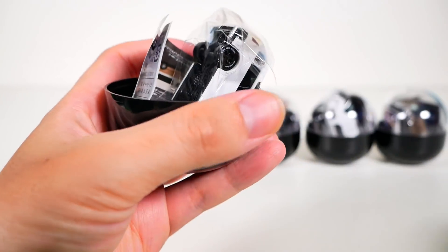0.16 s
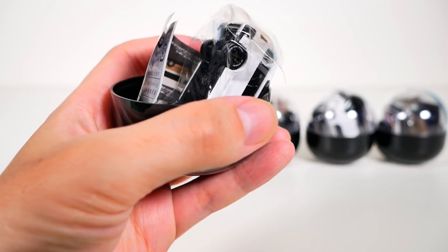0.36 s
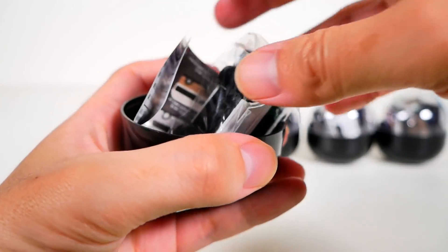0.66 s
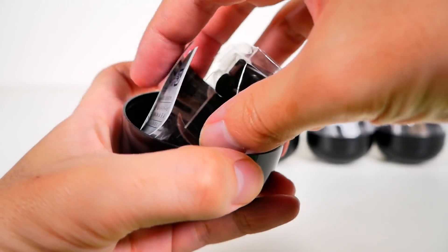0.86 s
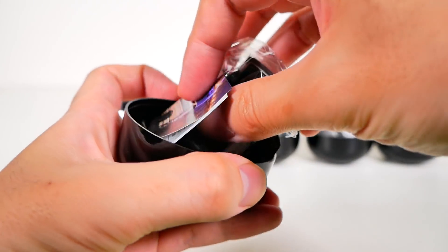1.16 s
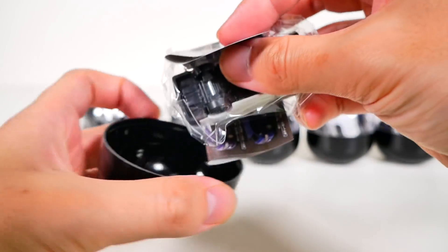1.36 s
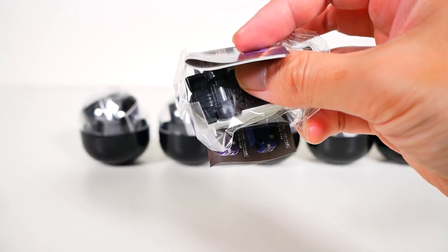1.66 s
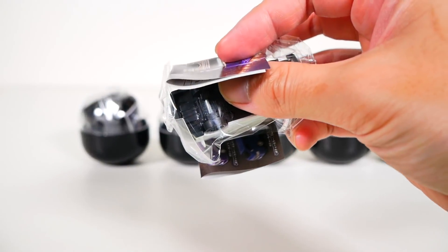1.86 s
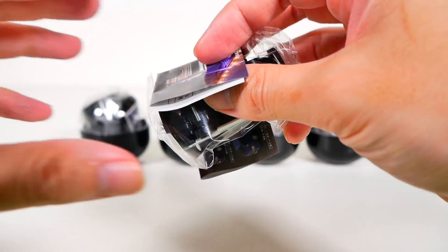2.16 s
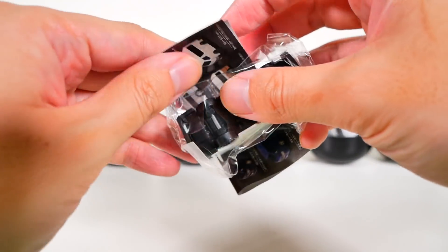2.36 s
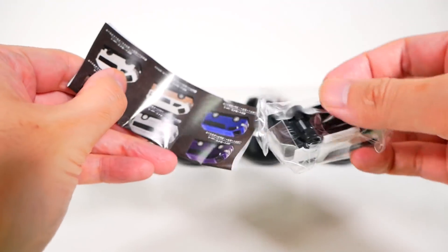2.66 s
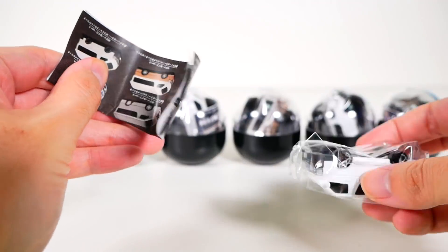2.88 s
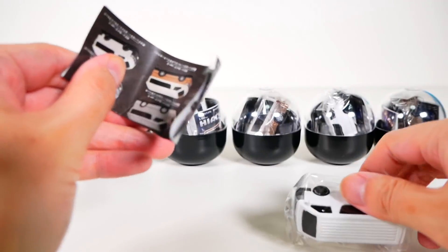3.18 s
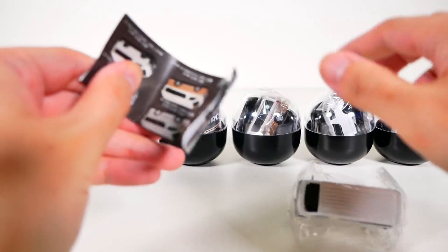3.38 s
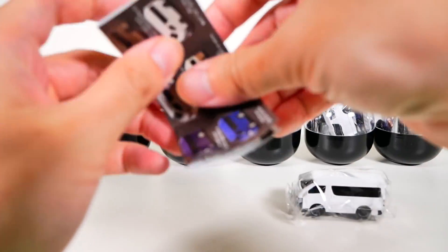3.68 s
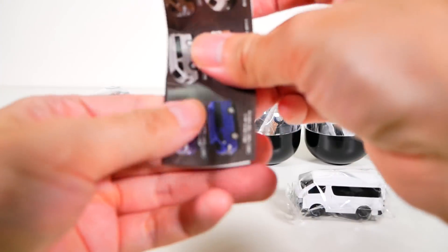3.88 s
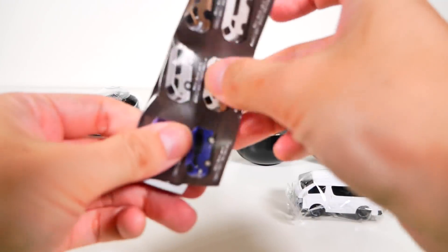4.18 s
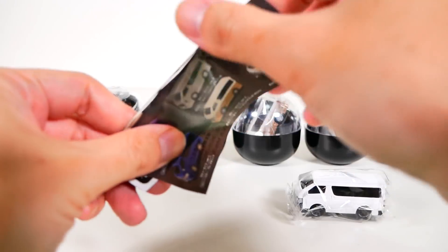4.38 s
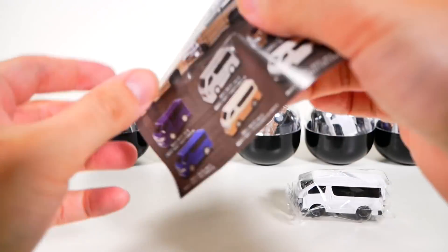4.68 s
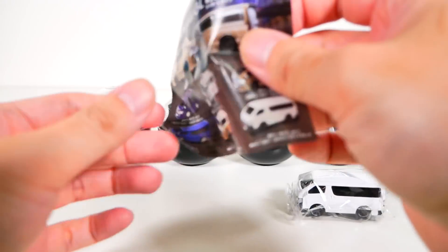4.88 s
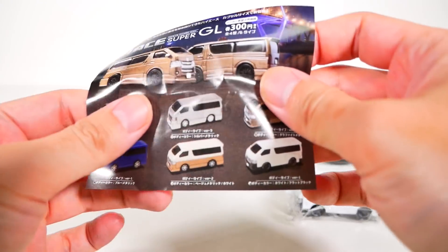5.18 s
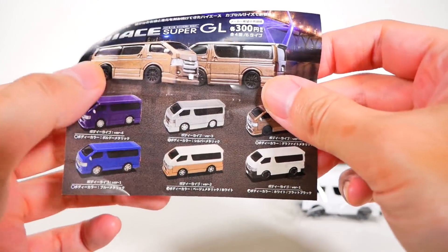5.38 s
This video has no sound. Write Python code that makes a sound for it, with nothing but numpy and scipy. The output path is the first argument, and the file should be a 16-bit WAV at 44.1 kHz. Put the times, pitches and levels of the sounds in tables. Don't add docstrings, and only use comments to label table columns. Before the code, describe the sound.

A close, dry mono pickup in a small room with soft hush and a faint low motor hum that sinks slightly. After a light rustle, at about 0.28 s a thin hard plastic lid clacks on a table, bounces once and trembles briefly. A near-quiet gap follows until 0.6 s, when fingers scrape crinkly film and a folded leaflet inside a hollow cup, boxy and ticking, until about 1.4 s. Sparse ticks lead to the empty cup's hollow knock at 1.8 s. Handling is light until 2.3 s, then bright film crackles and snaps densely, with short creaky slips, through 3.6 s. From about 4 s only glossy paper is handled: smoother, duller rustles, sharp creases near 4.0, 4.7, 4.9 and 5.25 s, soft fingertip pats and low flaps. Fluttering puffs of air brush the microphone, strongest after 4.2 s, and a last low bump comes at 5.5 s.

```python
import sys
import numpy as np
from scipy import signal
from scipy.fft import rfft, irfft, next_fast_len
from scipy.io import wavfile
from scipy.ndimage import uniform_filter1d, map_coordinates

SR = 44100
rng = np.random.default_rng(int(sys.argv[2]) if len(sys.argv) > 2 else 0)


def gain_from_db(level_db):
    decades = np.asarray(level_db, float) / 20
    return 10 ** decades


def dump(signal):
    limited = np.clip(np.atleast_2d(signal).T, -1, 1)
    pcm = np.round(limited * 32767).astype(np.int16)
    wavfile.write(sys.argv[1], SR, pcm)


N = 244314

OUT_S = 1.385
BAG_GONE_S = 4.0


def unit(x):
    return x / np.sqrt(np.mean(x ** 2) + 1e-20)


def even(rows):
    return rows / np.linalg.norm(rows, axis=1, keepdims=True)


def along(points, hz):
    f, v = np.transpose(points)
    return np.interp(np.log(hz + 1), np.log(f + 1), v)


def wobble(rate):
    return map_coordinates(rng.standard_normal(int(N * rate / SR) + 4), [np.arange(N) * rate / SR])


def coloured(x, spectrum):
    size = 8192
    gain = gain_from_db(along(spectrum, np.fft.rfftfreq(size, 1 / SR)))
    cepstrum = irfft(np.log(gain + 1e-4))
    cepstrum[1:size // 2] *= 2
    cepstrum[size // 2 + 1:] = 0
    response = irfft(np.exp(rfft(cepstrum)))
    return signal.fftconvolve(x, response / np.linalg.norm(response))[:N]


def resonant(x, modes):
    size = next_fast_len(N + SR // 4)
    f = np.fft.rfftfreq(size, 1 / SR)
    gain = 0
    for k, (centre, width, db) in enumerate(modes):
        damping = 1j * f * width
        gain = gain + (-1) ** k * gain_from_db(db) * damping / (centre * centre - f * f + damping)
    return irfft(rfft(x, size) * gain, size)[:N]


def placed(times, rows):
    at = np.round(times * SR).astype(int)[:, None] + np.arange(rows.shape[1])
    return np.bincount(at.ravel(), rows.ravel(), N + rows.shape[1])[:N]


def gestures(start, hold, db, rise, sag, fall, rest_db):
    now = np.arange(0, N + 64, 64) / SR
    t = now - start[:, None]
    held = np.clip(t, 0, np.abs(hold)[:, None])
    shape_db = db[:, None] + rise * np.minimum(t, 0) - sag * held - fall * (np.maximum(t, 0) - held)
    total = np.sqrt(np.sum(gain_from_db(2 * shape_db), axis=0) + gain_from_db(2 * rest_db))
    return np.interp(np.arange(N) / SR, now, total)


def hush():
    # hz, level_db per Hz
    hush_spectrum = [(10, -7), (18, 22.5), (30, -10), (125, -10), (700, -10.5), (2200, -30), (8300, -20.5),
                     (16000, -50)]
    return gain_from_db(-55.5) * unit(coloured(rng.standard_normal(N), hush_spectrum))


def hum():
    # time_s, pitch_hz
    motor_speed = [(0, 41.63), (1.0, 41.13), (1.9, 38.95), (5.5, 38)]
    now = np.arange(N) / SR
    turn = 2 * np.pi * np.cumsum(np.interp(now, *np.transpose(motor_speed))) / SR
    orders = np.sin(np.arange(2, 5)[:, None] * turn)
    start_db = np.array([[-58], [-59], [-66]])
    fade_db_per_s = np.array([[.6], [1.5], [1.1]])
    level_db = start_db - fade_db_per_s * now + 0.81 * wobble(4.16)
    return np.sum(gain_from_db(level_db) * orders, axis=0)


def room(x):
    # hz, t60_s
    wall_decay = [(200, 0.21), (1400, 0.14), (4000, 0.17), (10000, 0.14)]
    out, step = np.zeros(N + SR), int(.3 * SR)
    for at in range(0, N, step):
        hz, t, z = signal.stft(rng.standard_normal(SR // 3), SR, nperseg=256)
        fade = gain_from_db(-60 * t / along(wall_decay, hz)[:, None])
        tail = signal.istft(z * fade, SR, nperseg=256)[1]
        delayed = np.pad(tail, (120, 0)) / np.linalg.norm(tail)
        wet = signal.fftconvolve(x[at:at + step], delayed)
        out[at:at + len(wet)] += wet
    return out[:N]


def wafts():
    # start_s, hold_s, level_db
    fanning = [(1.38, 0.067, -56), (1.577, 0.22, -56), (1.978, 0.029, -57), (2.3, 0.034, -43),
               (3.652, 0.049, -43.5), (3.847, 0.1, -45.5), (4.18, 0.024, -35.5), (4.392, 0.026, -56),
               (4.64, 0.12, -41.5), (4.819, 0.16, -35), (5.19, 0.015, -38), (5.315, 0.12, -39),
               (5.482, 0.071, -34)]
    # hz, level_db per Hz
    puff_spectrum = [(18, -20), (34, 0.5), (68, 1), (130, -5.5), (250, -14.5), (500, -39)]
    fan = gestures(*np.transpose(fanning), rise=306, sag=0, fall=192, rest_db=-54.5)
    return fan * gain_from_db(2.5 * wobble(14) - 1) * unit(coloured(rng.standard_normal(N), puff_spectrum))


def thuds():
    # start_s, level_db, pitch_hz, t60_s
    swings = [
        (0.275, -33, 70, 0.054),
        (0.289, -32, 125, 0.12),
        (0.293, -32, 222, 0.12),
        (1.812, -30, 59, 0.034),
    ]
    s, db, hz, t60 = np.transpose(swings)[:, :, None]
    t = np.arange(SR // 5) / SR
    return placed(s[:, 0], gain_from_db(db - 60 * t / t60) * np.sin(2 * np.pi * hz * t))


def shells():
    # start_s, peak_db
    landings = [
        (0.2771, 0),
        (0.2897, -14),
        (1.8118, -6.5),
    ]
    # pitch_hz, level_db, t60_s
    lid_modes = [(1150, 5, .007), (2580, -5, .006), (4240, -4, .006), (6100, -2, .005), (8210, -1, .01)]
    cup_modes = [(710, -12.5, 0.12), (813, 1, 0.043), (1100, 3, 0.017), (1500, -51, 0.02)]
    t = np.arange(SR // 4) / SR

    def ring(modes, damp):
        return sum(gain_from_db(db - 60 * t / (damp * t60)) * np.sin(2 * np.pi * hz * t) for hz, db, t60 in modes)

    table = 0.57 * gain_from_db(-60 * t / 0.048) * np.sin(2 * np.pi * 130 * t)
    table = table + 1.25 * gain_from_db(-60 * t / 0.0056) * np.sin(2 * np.pi * 900 * t)
    lid = gain_from_db(-6.5) * (ring(lid_modes, damp=0.69) + table)
    cup = ring(cup_modes, damp=0.66)
    s, db = np.transpose(landings)
    colour = [(100, 0.0), (900, 2.0), (8500, -8.0), (11000, -6), (16400, -33)]  # (Hz, dB)
    wide = coloured(rng.standard_normal(len(t)), colour)[:len(t)]
    shiver = placed(s[:1], gain_from_db(-19.5 - 60 * t / 0.24)[None] * wide)
    return shiver + placed(s, gain_from_db(db[:, None] + [[4], [3], [4]]) * [lid, lid, cup])


def material(x):
    # hz, level_db per Hz
    film_spectrum = [(900, -41), (1600, -15), (3200, -2), (6200, 0.5), (8000, 4), (10900, -12),
                     (14500, -8.5), (16400, -47)]
    paper_spectrum = [(400, -14.5), (1200, -10), (2400, -5), (4000, 2), (8800, -6), (10300, -21.5),
                      (16400, -30)]
    bag = np.arange(N) < BAG_GONE_S * SR
    return coloured(x * bag, film_spectrum) + coloured(x * ~bag, paper_spectrum)


def grit(per_s, size_db, share):
    sizes = np.minimum(rng.exponential(1, N), 3)
    struck = rng.random(N) < per_s / SR * gain_from_db(5 * wobble(40))
    bursts = np.convolve(struck * gain_from_db(size_db * sizes), gain_from_db(-60 * np.arange(200) / SR / 0.031))[:N]
    share = np.clip(share, 0, 1)
    return rng.standard_normal(N) * (share * unit(bursts) + 1 - share)


def patchy(x, depth_db):
    z = signal.stft(x, nperseg=256)[2]
    field = uniform_filter1d(rng.standard_normal(z.shape), size=9, axis=0)
    field = uniform_filter1d(field, size=14, axis=1)
    return signal.istft(z * gain_from_db(depth_db * unit(field)), nperseg=256)[1][:N]


def crinkle(count, hz, spread_db, cycles):
    when, size = rng.random((count, 2)).T
    clumps = np.cumsum(gain_from_db(6 * wobble(30)))
    s = np.interp(when, clumps / clumps[-1], np.arange(N) / SR)
    pitch = np.clip(hz * gain_from_db(spread_db * rng.standard_normal((count, 1))), 700, 13000)
    turns = pitch * np.arange(220) / SR
    pops = even(np.sin(2 * np.pi * turns) * gain_from_db(-60 * turns / cycles) * (1 - np.exp(-turns)))
    gain = gain_from_db(-5 * np.log(np.maximum(size, .08)))
    return unit(placed(s, gain[:, None] * pops))


def rubbing():
    # start_s, hold_s, rustle_db, hollow_body_db re rustle
    hand_strokes = [(0, .14, -50.5, 6.5), (0.576, 0.039, -49.5, -3), (0.715, 0.021, -43, 2.5),
                    (0.742, 0.1, -34.5, 3), (0.891, 0.073, -39, 4), (0.917, 0.078, -37.5, 2.5),
                    (1.085, 0.043, -37.5, 2), (1.127, 0.085, -40.5, 6), (1.232, 0.1, -41, 3.5),
                    (1.385, 0.046, -52, 5), (1.684, 0.074, -55.5, -4), (1.817, 0.02, -47.5, 15.5),
                    (1.931, 0.37, -54.5, 6), (2.29, 0.016, -33.5, -2.5), (2.368, 0.043, -36, -1.5),
                    (2.534, 0.01, -43, -22), (2.433, 0.073, -32, -5), (2.588, 0.048, -29.5, -3),
                    (2.701, 0.068, -35.5, 0.5), (2.802, 0.046, -36, -10), (2.883, 0.024, -36, -1),
                    (2.948, 0.066, -38.5, -11), (3.071, 0.014, -27.5, -1), (3.158, 0.024, -31, 2.5),
                    (3.261, 0.023, -38, -4), (3.306, 0.011, -31, 5.5), (3.375, 0.0075, -40.5, -7),
                    (3.417, 0.05, -42.5, -2), (3.472, 0.04, -30, 0), (3.535, 0.21, -37, -2),
                    (3.841, 0.22, -44.5, -2), (4.021, 0.2, -36.5, -1.5), (4.123, 0.25, -34.5, -7),
                    (4.371, 0.028, -31, -7), (4.517, 0.35, -39, -6.5), (4.692, 0.15, -40, 1),
                    (4.84, 0.16, -37.5, 1), (5.158, 0.0055, -36.5, 0.5), (5.268, 0.38, -44, 0.5),
                    (5.512, .03, -45, 16)]
    # pitch_hz, width_hz, level_db
    cup_air = [(1450, 330, 19), (3490, 240, 9.5)]
    # hz, level_db per Hz
    sheet_spectrum = [(90, -38), (330, -5), (800, 2), (2000, -4), (4500, -24)]
    gloss_spectrum = [(5000, -10), (9000, 10.5), (13500, 3), (16400, -6)]
    s, hold, db, body_db = np.transpose(hand_strokes)
    now = np.arange(N) / SR
    grip = dict(rise=2604, sag=29.5, fall=278, rest_db=-65)
    slide = gestures(s, hold, db, **grip)
    deep = gestures(s, hold, db + body_db, **grip)
    slip_db = 1.5 * wobble(30) + 2.5 * wobble(110)

    hiss = unit(patchy(material(grit(per_s=2500, size_db=4, share=.3)), depth_db=2))
    crisp = np.where(now < BAG_GONE_S, .75, .4)
    pops = crinkle(count=3500, hz=4000, spread_db=4.5, cycles=16)
    rustle = slide * gain_from_db(.6 + slip_db) * (.8 * hiss + crisp * pops)

    push = patchy(grit(per_s=250, size_db=3.5, share=.45), depth_db=1.5)
    inside = np.clip((OUT_S - now) / 0.15, 0, 1)
    hollow = gain_from_db(6.5) * unit(resonant(push, cup_air))
    sheet = unit(coloured(push, sheet_spectrum))
    body = deep * gain_from_db(slip_db - 2.5) * (0.56 * inside * hollow + (1 - 0.7 * inside) * sheet)

    skin = slide * (now > BAG_GONE_S - .4) * unit(coloured(rng.standard_normal(N), gloss_spectrum))
    return rustle + body + gain_from_db(-7.5) * skin


def drags():
    # start_s, length_s, level_db, pitch_hz
    folds = [(1.086, 0.049, -25, 3400), (1.104, 0.026, -22, 1700), (2.287, 0.01, -26, 3140),
             (2.305, 0.0095, -13.5, 3580), (2.289, 0.06, -25, 1910), (2.594, 0.0089, -9, 1940),
             (3.32, 0.0084, -17, 900), (3.474, 0.0086, -16.5, 4700), (3.545, 0.044, -24.5, 1960),
             (3.498, 0.039, -22, 2080), (4.126, 0.051, -32, 4730), (4.506, 0.017, -43, 3540),
             (4.637, 0.046, -31.5, 3000), (4.694, 0.0096, -14, 3500)]
    slips_per_s, slip_cycles, spread_db, count = 740, 53, 3.5, 48
    start, long_s, db, hz = np.transpose(folds)[:, :, None]
    gap, size, bend = rng.random((len(folds), 3, count)).transpose(1, 0, 2)
    after = np.cumsum(2 * gap, axis=1) / slips_per_s
    swell = np.sqrt(np.abs(np.sin(np.pi * np.clip(after / long_s, 0, 1))))
    gain = gain_from_db(db + 17.5 - 11.0 * size) * swell * (after < long_s)
    pitch = hz * gain_from_db(spread_db * (hz / 3000) ** 2 * (bend - .5))
    turns = pitch.reshape(-1, 1) * np.arange(500) / SR
    slips = even(np.sin(2 * np.pi * turns) * gain_from_db(-60 * turns / slip_cycles))
    return placed((start + after).ravel(), gain.reshape(-1, 1) * slips)


def crushes():
    # start_s, length_ms, level_db
    crushed = [(1.1998, 2, -15.5), (2.629, 1.5, -14), (3.046, 1.3, -14), (3.1742, 1.5, -13.5),
               (3.901, 1.2, -26.5), (4.037, 1.3, -9.5), (4.1861, 4.7, -10), (4.218, 1.5, -29),
               (4.7, 4, -26), (4.854, 4.4, -15), (4.879, 1.1, -18), (4.9603, 2.1, -14), (5.008, 1.8, -25.5),
               (5.403, 4.8, -17)]
    s, ms, db = np.transpose(crushed)[:, :, None]
    lead = .012
    u = (np.arange(SR // 30) / SR - lead) / (np.clip(ms, .5, 8) / 1000)
    swell = np.minimum(gain_from_db(10.4 * u), gain_from_db(-12 * u)) * rng.standard_normal(u.shape)
    return material(placed(s[:, 0] - lead, gain_from_db(db + 17.5) * even(swell)))


def ticks():
    # start_s, peak_db, pitch_hz
    wrinkles = [(.059, -22, 3070), (0.132, -24, 1870), (0.579, -31, 5950), (0.605, -15.5, 1714),
                (0.616, -23.5, 1730), (0.7002, -19, 1550), (0.728, -19, 3330), (0.755, -14.5, 1520),
                (0.77, -16, 3230), (0.8054, -15, 2350), (0.838, -12, 3350), (.92, -24, 3350),
                (0.9345, -8, 4100), (0.956, -12, 5360), (0.9967, -17.5, 6500), (1.024, -19.5, 1760),
                (1.085, -26, 2860), (1.0943, -13, 3850), (1.1128, -19, 3000), (1.1245, -14, 2900),
                (1.1462, -16, 3850), (1.245, -16.5, 3900), (1.2912, -11.5, 1940), (1.335, -24, 2180),
                (1.3597, -45, 2540), (1.4405, -19.5, 8300), (1.538, -20.5, 5430), (1.711, -13, 4450),
                (1.945, -23.5, 3140), (1.9725, -20, 8550), (2.0643, -20, 5270), (2.089, -9, 1686),
                 (2.1352, -15.5, 6080), (2.163, -14.5, 5100), (2.201, -20, 9000), (2.288, -26, 3760),
                 (2.3084, -17, 3300), (2.3394, -25, 2220), (2.406, -15.5, 8000), (2.434, -9.5, 2760),
                 (2.4526, -12, 4460), (2.666, -28, 4900), (2.7146, -28, 5230), (2.761, -20, 3520),
                 (2.993, -29, 4630), (3.007, -21, 2020), (3.067, -22, 6230), (3.1546, -40, 1670),
                 (3.2695, -14.5, 6060), (3.324, -26, 4520), (3.427, -23, 5070), (3.478, -23, 4040),
                 (3.4941, -7.5, 2440), (3.512, -23, 2000), (3.5573, -17.5, 2250), (3.58, -33, 2100),
                 (3.6166, -13, 7520),
                (3.6953, -8.5, 1565), (3.7616, -10.5, 2550), (3.8378, -29.5, 4130), (3.904, -26, 1480),
                  (3.925, -14, 3620), (3.9426, -9.5, 5110), (4.0274, -18, 2330), (4.1258, -14, 3940),
                  (5.4005, -13.5, 11900), (4.409, -21, 4700), (4.538, -24.5, 4860), (4.6396, -14.5, 4750),
                  (4.6981, -8, 2330), (4.7121, 0, 2650), (4.7654, -15, 2200), (4.836, -19, 2970),
                  (4.836, -27.5, 11400), (4.9542, -19, 2200), (5.0073, -16.5, 3260), (5.153, -31, 2260),
                  (5.1575, -33, 1300), (5.2, -13, 2440), (5.2586, -3, 2376), (5.362, -14.5, 1100),
                  (5.383, -14, 1650), (5.472, -14, 1100),
                (0.388, -26.5, 726), (1.414, -20.5, 720), (2, -27, 466), (2.097, -14, 665),
             (2.216, -13.5, 688), (3.762, -12.5, 750), (0.056, -24, 393), (1.099, -17, 550),
             (1.12, -12.5, 533), (1.43, -28.5, 297), (2.486, -9, 376), (5.524, -4.5, 252),
                (.0724, -36, 5030), (.2952, -18, 8740), (1.1576, -21, 5900), (1.1772, -14, 8300),
                    (1.3588, -25, 8310), (2.2745, -40, 7570), (2.4088, -20, 8400), (2.414, -23, 8330),
                    (2.4214, -24, 7790), (2.4427, -21, 7800), (2.5194, -26, 6500), (2.5914, -13, 9000),
                    (2.738, -16, 7350), (2.768, -25, 8160), (2.8054, -24, 7430), (3.007, -22, 7800),
                    (3.0668, -18, 8500), (3.1164, -28, 8490), (3.14, -31, 6200), (3.1623, -21, 5000),
                    (3.279, -29, 6500), (3.39, -30, 7440), (3.4918, -14, 7200), (3.7774, -36, 6950),
                    (3.8704, -31, 5020), (3.9005, -27, 5500), (4.3284, -34, 6300), (4.6076, -30, 6530),
                    (4.851, -19, 5000), (4.9552, -20, 6780), (5.1556, -30, 7600), (2.62, -14, 11000),
                (0.196, -32, 1600), (0.462, -41, 1570), (0.938, -25, 1520), (1.089, -18, 2930),
                 (1.1, -8, 1500), (1.1959, -11, 5540), (1.215, -14.5, 1560), (1.2794, -26, 1640),
                 (1.6614, -41, 4760), (3.345, -23, 5540), (3.4364, -24, 4440), (3.665, -20, 1774),
                 (4.006, -30, 1690), (4.1594, -29, 4980), (4.168, -16.5, 3980), (4.2173, -22, 4260),
                 (4.352, -22, 4930),
                (2.813, -34, 474), (2.91, -35, 819), (2.978, -23, 810), (2.99, -19, 726), (3.008, -20, 1060),
            (3.045, -11, 1130), (3.153, -15, 850), (3.208, -35, 710), (3.326, -4.5, 1045),
            (3.494, -12, 1210), (3.551, -15.5, 730), (3.662, -17, 810), (3.904, -16, 854),
            (3.923, -14.5, 700), (4.111, -25, 388), (4.123, -13, 660), (4.144, -25, 721), (4.159, -18, 464),
            (4.223, -16, 690), (4.226, -18.5, 705), (4.316, -24, 576), (4.588, -25, 680), (4.629, -25, 760),
            (4.638, -18, 795), (4.666, -14.5, 584), (4.697, -9.5, 850), (4.807, -21, 310),
            (5.007, -22, 695), (5.152, -10.5, 710), (5.161, -25, 766), (5.286, -18.5, 573),
            (5.459, -27, 890), (5.316, -20, 392), (5.41, -28, 725), (5.438, -17, 474), (5.47, -11, 443)]
    events = np.array(wrinkles)
    s, db, hz = events.T[:, :, None]
    t = np.arange(SR // 30) / SR
    a, b = rng.standard_normal((len(s), 2, len(t))).transpose(1, 0, 2)
    rise = 1 - np.exp(-t / 0.001)
    drift = np.cumsum(.006 * np.sqrt(hz) * a, axis=1)
    tone = np.sin(2 * np.pi * hz * t + drift) * gain_from_db(-60 * t * hz / 18)
    wide = gain_from_db(8 * np.log2(hz / 5000)) * even(rise * b * gain_from_db(-60 * t / .008))
    dulling = 1 + (np.fft.rfftfreq(len(t), 1 / SR) / (3 * hz)) ** 2
    wide = irfft(rfft(wide) / dulling, len(t))
    crackle = material(placed(s[:, 0], gain_from_db(db + 8.5) * wide))
    return placed(s[:, 0], gain_from_db(db + 12.0) * even(rise * tone)) + crackle


def snaps():
    # start_s, crack_db, ring_db re crack, flap_db re crack
    cup_snaps = [(.2772, -2.5, -19, -28), (.2905, -34, -28, -8), (.826, -19.5, 11, -54),
                 (.9386, -18, -3.5, -37), (.9651, -12, 0.5, -15.5), (1.1047, -15.5, 1, -10),
                 (1.1688, -17.5, 8, -37), (1.1773, -29, -20, -27), (1.1974, -13.5, -4.5, -9.5),
                 (1.264, -26, 14.5, -8), (1.8051, -23, -26, -33), (1.812, -13, -5, -43),
                 (1.8227, -44.5, 19, 7)]
    bag_snaps = [(2.0577, -17, -36, -41), (2.378, -16.5, -38, -41), (2.4495, -7.5, -4.5, -36),
                 (2.485, -13.5, -2, -4), (2.5451, -12, -8, -15.5), (2.5865, -19, -10, -2),
                 (2.5886, -14.5, -5, -35), (2.5995, -22, 10.5, -37), (2.621, -38, -18, -19),
                 (2.6248, -7.5, -15, -20), (2.636, -19.5, -2, -36), (2.7018, -13, -16.5, -24),
                 (2.7345, -14.5, -5, -18), (2.7901, -22, -6, 2), (2.813, -7.5, -16, -41),
                 (2.838, -12, -38, -43), (2.884, -5.5, -15, -52), (2.89, -17, -2, -6.5),
                 (2.952, -3.5, -18.5, -35), (3.042, -8.5, -0.5, -30), (3.0726, -13.5, -11, -41),
                 (3.0861, -16.5, -14, -13), (3.172, -6.5, -12.5, -16.5), (3.3039, -18.5, 1, -12),
                 (3.311, -19, -10, -2.5), (3.336, -12, -4.5, -17), (3.3755, -16.5, 4, -34),
                 (3.418, -17.5, -8, -36)]
    leaf_snaps = [(3.4743, -29, -3, 7.5), (3.4977, -26, 6, 0), (3.5211, -14, 3.5, -8.5),
                  (3.9546, -14.5, -17, -16.5), (4.0333, -6, -1, -18.5), (4.1854, -20, 1, 0),
                  (4.7119, -27, -11, 12.5), (4.753, -12, -5, -3), (4.851, -33, 14, 14.5),
                  (4.858, -17.5, -6.5, 6.5), (4.875, -4, -16, -44), (4.9615, -10.5, -9, -10.5),
                  (4.9885, -23.5, 1.5, 4.5), (5.188, -17, -8, 2.5), (5.193, -28.5, 10, 11),
                  (5.258, -22, -7, -1.5), (5.4011, -17.5, 1, -2), (5.4125, -13, -4, -6.5),
                  (5.5157, -37.5, 12.5, 19.5), (5.5254, -22, 10.5, 2.5)]
    groups = cup_snaps, bag_snaps, leaf_snaps
    panel_hz, panel_spread_db = (1570, 1900, 1700), 0.45
    s, db, ring_db, flap_db = np.concatenate(groups).T[:, :, None]
    t = np.arange(SR // 30) / SR
    luck = rng.standard_normal((len(s), 4 + 3 * len(t)))
    a, b, c = luck[:, 4:].reshape(len(s), 3, -1).transpose(1, 0, 2)

    long_ms = 1.37 * gain_from_db(0.38 * ring_db)
    lead = .006
    u = (t - lead) / (np.clip(long_ms, .3, 8) / 1000)
    fade = np.minimum(gain_from_db(45 * u), gain_from_db(-12 * u))
    fade = fade + 1.5 * gain_from_db(-60 * np.abs(t - lead) / .0015)
    fade = fade + gain_from_db(-27 - 60 * (t - lead) / .03) * (t > lead)
    crack = material(placed(s[:, 0] - lead, gain_from_db(db + 20.5) * even(fade * a)))

    sizzle_db = -34.5 - 0.42 * np.maximum(ring_db, -22) - 6 * (s > BAG_GONE_S) + 1.4 * luck[:, :1]
    top = placed(s[:, 0] - lead, gain_from_db(db + sizzle_db + 31.0) * even(fade * b))
    sizzle = coloured(top, [(7000, -30.5), (10000, 4), (14000, -5.0), (16500, -62)])

    start = s[:, 0] - long_ms[:, 0] / 3000
    ring_hz = np.repeat(panel_hz, [len(g) for g in groups])[:, None]
    ring_hz = ring_hz * gain_from_db(panel_spread_db * luck[:, 2:3])
    uneven = 1 + 2.2 * uniform_filter1d(c, 40, axis=1)
    swing = np.sin(2 * np.pi * ring_hz * t) * (1 - np.exp(-t / .0005)) * gain_from_db(-60 * t / .009) * uneven
    ring = placed(start, gain_from_db(db + ring_db + 18.0) * even(swing))

    flap_hz = 720 * gain_from_db(1.65 * luck[:, 1:2])
    turn = 2 * np.pi * flap_hz * t + np.cumsum(.1 * b, axis=1)
    bend = np.sin(turn) * gain_from_db(-60 * t / .015) + .3 * np.sin(turn / 2) * gain_from_db(-60 * t / .02)
    flap = placed(start, gain_from_db(db + flap_db + 23.5) * even(bend))
    return crack + sizzle + ring + flap


def two_tracks(mono):
    z = signal.stft(mono, nperseg=1024)[2]
    apart = rng.random(z.shape[1]) < .25
    scrambled = z * apart * np.exp(2j * np.pi * rng.random(z.shape))
    blur = signal.istft(scrambled, nperseg=1024)[1][:N]
    trace = gain_from_db(-7.5) * coloured(blur, [(100, -1), (600, -4.5), (4000, -3.5), (13000, 4.5)])
    trace = trace + gain_from_db(-80) * rng.standard_normal(N)
    return np.array([mono + trace, mono - trace])


def scene():
    # hz, level_db
    small_radiator = [(60, -41), (150, -6.5), (300, -1.5), (16000, 4)]
    handled = snaps() + ticks() + shells() + drags() + crushes()
    near = gain_from_db(-1.27) * coloured(handled, small_radiator) + thuds()
    rub = rubbing()
    bed = gain_from_db(-13.5) * room(near + rub) + rub + wafts() + hush() + hum()
    lowpass = signal.ellip(6, .5, 40, 15700, fs=SR, output="sos")
    return two_tracks(near + signal.sosfilt(lowpass, bed))


def band_limit(x):
    return signal.sosfilt(signal.butter(12, 16500, fs=SR, output="sos"), x)


def record(dry):
    full = dry / (1 + np.abs(dry / .9) ** 8) ** (1 / 8)
    full = signal.sosfiltfilt(signal.ellip(8, .1, 60, 16200, fs=SR, output="sos"), full)
    return band_limit(full)


dry = scene()
out = record(dry)
dump(out)
```